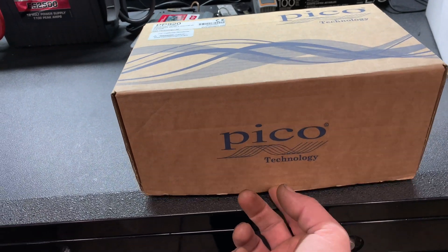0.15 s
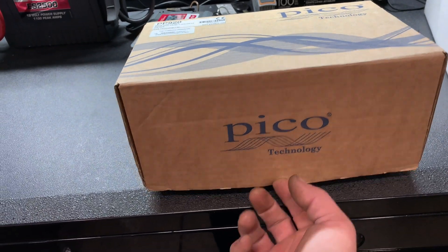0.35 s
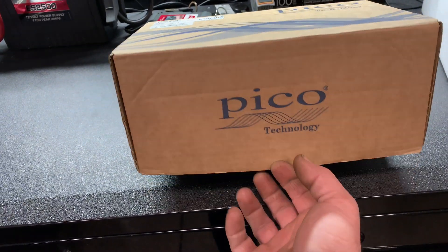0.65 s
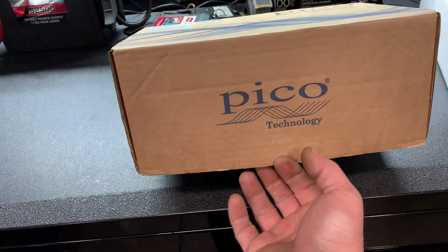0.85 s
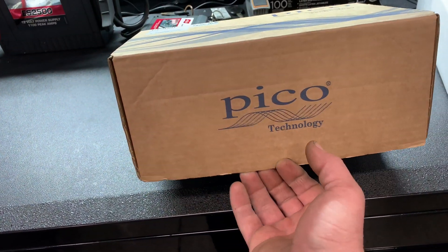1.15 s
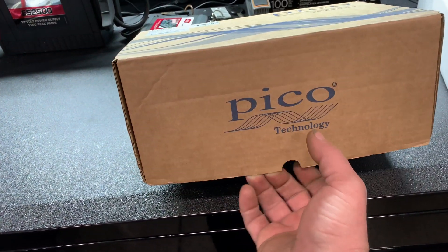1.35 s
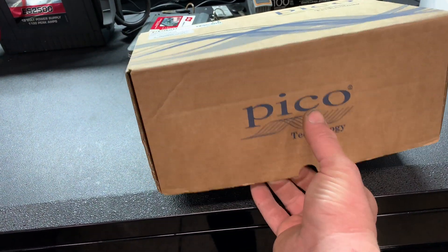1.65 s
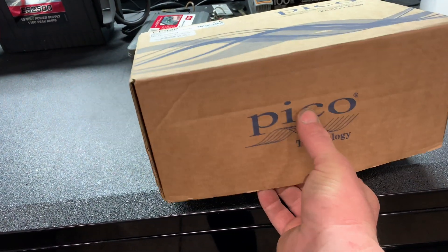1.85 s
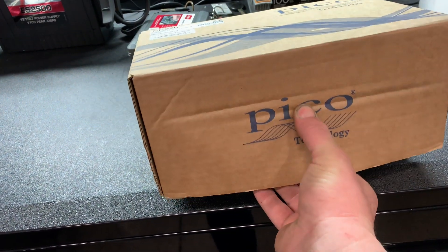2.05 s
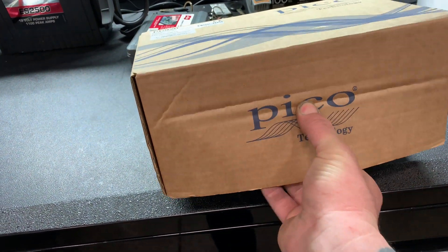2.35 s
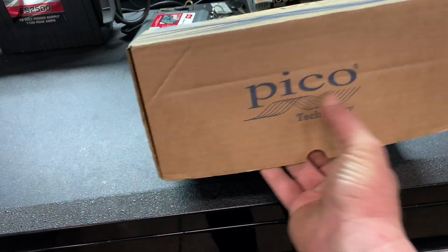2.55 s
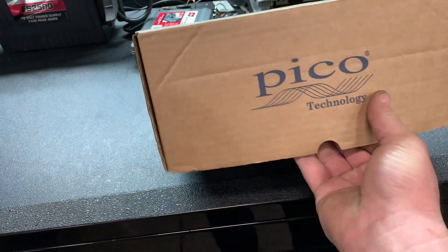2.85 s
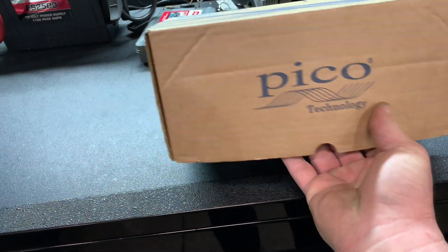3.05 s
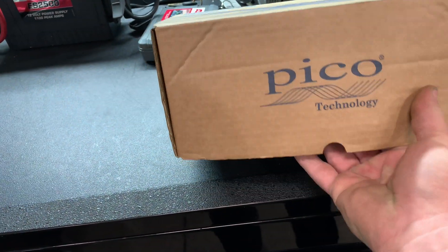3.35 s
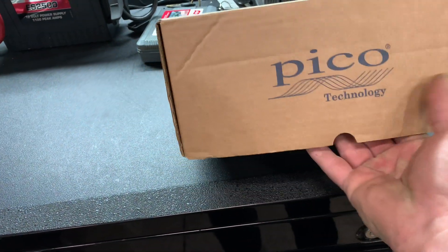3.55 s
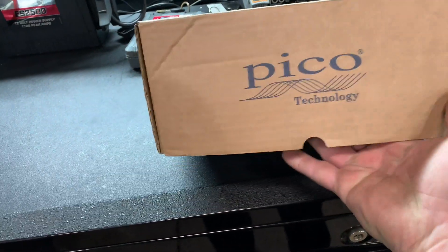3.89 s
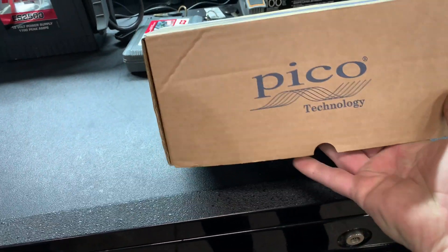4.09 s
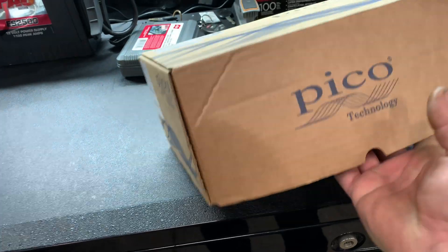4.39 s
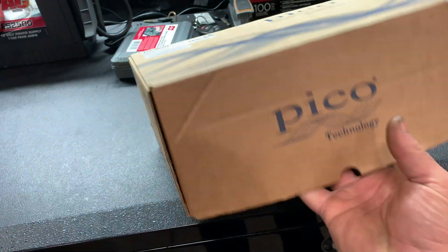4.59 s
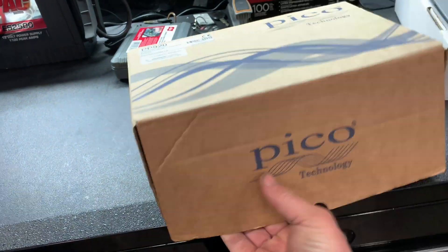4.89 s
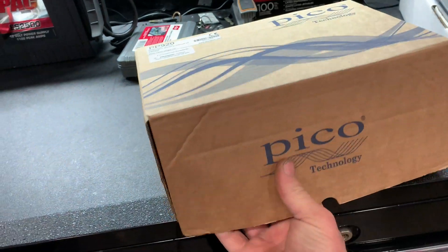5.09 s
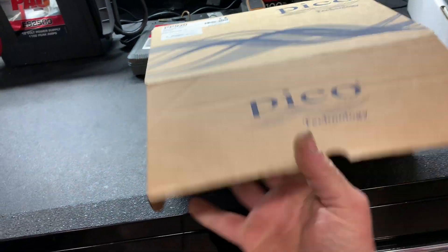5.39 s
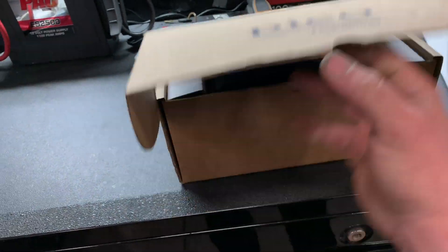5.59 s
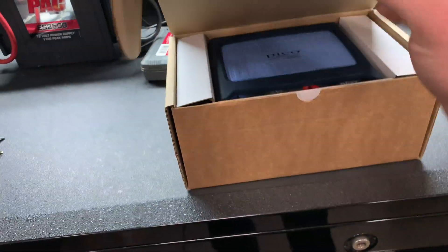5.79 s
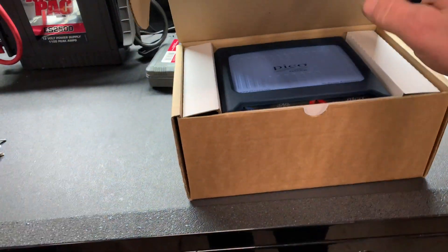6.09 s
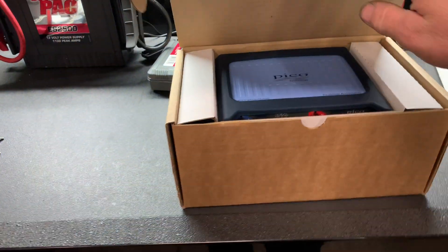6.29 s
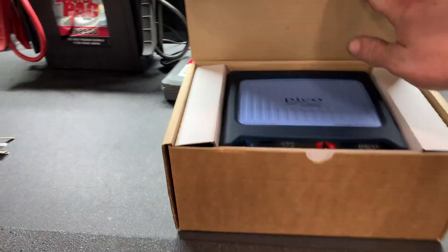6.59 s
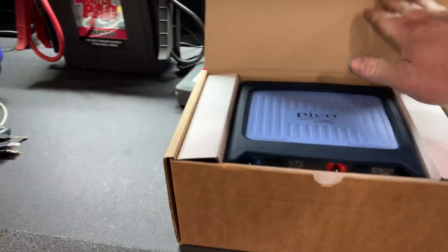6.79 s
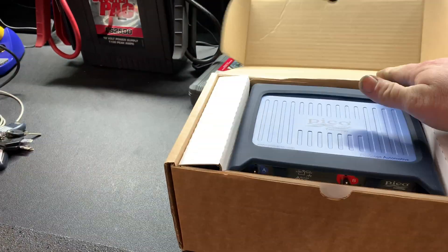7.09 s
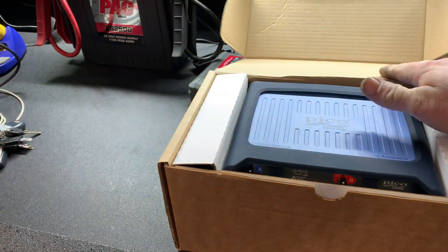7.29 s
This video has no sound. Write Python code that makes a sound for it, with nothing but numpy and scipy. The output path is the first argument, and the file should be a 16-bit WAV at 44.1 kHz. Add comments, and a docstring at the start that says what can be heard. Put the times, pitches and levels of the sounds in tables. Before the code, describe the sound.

Dry skin rasps and knocks on cardboard, a sharp flap crack, brief lid friction, and finally a loud quick double slap in a quiet workshop.

```python
"""Workshop, at a workbench: a hand gropes along a cardboard box, tugs its tucked flap, lifts the lid, slaps the contents.
Rubbing and palm are filtered noise; knocks, thuds, slaps and a dry crack are decaying noise bursts and tones.
Dragged flap edges are noise in one narrow resonance each. The room echoes the box; behind it are
a low rumble and thin fizz of filtered noise and a faint whine of two unsteady tones."""
import sys
import numpy as np
from scipy import signal
from scipy.fft import rfft, irfft, next_fast_len
from scipy.io import wavfile
from scipy.ndimage import uniform_filter1d, map_coordinates

SR = 44100
rng = np.random.default_rng(int(sys.argv[2]) if len(sys.argv) > 2 else 0)


def transcribe(signal):
    """Save signal, clipped to [-1, 1], as a 16-bit WAV file at the path in sys.argv[1]."""
    frames = np.atleast_2d(signal).T
    limited = np.clip(frames, -1, 1)
    pcm = np.round(limited * 32767).astype(np.int16)
    wavfile.write(sys.argv[1], SR, pcm)


N = 328148

# Resonances of the hollow box. Each row: centre in Hz, width in Hz, weight in dB.
PANELS = [(96.3, 36.4, -0.5), (227.5, 120.5, 2), (295.5, 143, 4), (405.7, 152, -1)]
# Resonances of the flaps. Each row: centre in Hz, width in Hz, weight in dB.
BOARD = [(796, 562, -3.5), (1206, 852, 3), (1501, 682, 4), (1832, 437, -1), (2450, 890, -9.5),
         (4010, 1600, -16.5)]
# Colour of skin hiss and crackle. Each row: frequency in Hz, gain in dB.
SKIN = [(800, -7), (2500, 1.5), (4500, -3.5), (7500, 2), (10000, 6), (13000, 5), (15300, 1.5), (16400, -16)]
SWELL_SHARPNESS = 0.95  # exponent of the arch of strokes and scrapes


def amp(db):
    """Gain of a level in dB."""
    return 10 ** (np.asarray(db) / 20)


def unit(x):
    """Scaled to rms 1."""
    return x / np.sqrt(np.mean(x ** 2) + 1e-20)


def along(points, hz):
    """(Hz, value) points interpolated on a log frequency axis."""
    f, v = np.transpose(points)
    return np.interp(np.log(hz + 1), np.log(f + 1), v)


def curves(rows):
    """One value per sample for each column after the time."""
    s, *cols = np.transpose(rows)
    return [np.interp(np.arange(N) / SR, s, c) for c in cols]


def swells(rows, peak, sharp):
    """Gain for each dB column: each row swells to its peak (share of length) and fades; overlaps add in power."""
    start, length, *cols = np.transpose(rows)[:, :, None]
    u = np.clip((np.arange(0, N, 32) / SR - start) / length, 0, 1)
    warped = u ** (np.log(.5) / np.log(peak))
    arch = np.abs(np.sin(np.pi * warped)) ** sharp
    return [np.repeat(np.linalg.norm(amp(db) * arch, axis=0), 32)[:N] for db in cols]


def span(start_s, t):
    """Samples taken by an event with time axis t."""
    first = round(start_s * SR)
    return slice(first, first + len(t))


def wobble(rate_hz):
    """A smooth random curve, rate_hz knots a second."""
    knots = rng.standard_normal(int(N * rate_hz / SR) + 4)
    return map_coordinates(knots, [np.arange(N) * rate_hz / SR])


def filtered(x, response):
    """x times a complex response of frequency."""
    m = next_fast_len(N + SR // 2)
    return irfft(rfft(x, m) * response(np.fft.rfftfreq(m, 1 / SR)), m)[..., :N]


def ringing(modes):
    """Causal response of a few resonances summed with alternating sign."""
    def response(f):
        total = 0
        for k, (centre, width, db) in enumerate(modes):
            resonance = 1j * f * width / (centre * centre - f * f + 1j * f * width + 1e-9)
            total = total + (-1) ** k * amp(db) * resonance
        return total
    return response


def skin_colour(f):
    """Gain of skin on board against frequency."""
    return amp(along(SKIN, f))


def grit(rate_hz, spiky_db, patchy_db):
    """Fibres catching: noise whose size wanders at rate_hz and whose colour shifts as the contact moves."""
    z = signal.stft(rng.standard_normal((2, N)), nperseg=256)[2]
    field = uniform_filter1d(rng.standard_normal(z.shape[1:]), size=2, axis=0)
    field = uniform_filter1d(field, size=10, axis=1)
    patchy = signal.istft(z * amp(patchy_db * unit(field)), nperseg=256)[1][:, :N]
    return patchy * amp(spiky_db * wobble(rate_hz))


def spread(pair, alike):
    """Channels mixed as mid and side, so that unrelated ones leave with the given left-right likeness."""
    def weights(hz):
        turn = np.arccos(np.clip(along(alike, hz), 0, 1)) / 2
        return np.array([np.cos(turn), np.sin(turn)])
    mid, side = filtered(pair, weights)
    return np.array([mid + side, mid - side])


def background():
    """A lumpy low rumble and thin bands of fizz from filtered noise, and two whining tones of unsteady level and phase."""
    # Rumble colour. Each row: frequency in Hz, gain in dB.
    rumble_colour = [(18, -60), (33, 1), (55, -1.5), (100, -13), (400, -33.5), (900, -40), (3500, -50),
                     (16000, -62)]
    # Fizz bands. Each row: centre in Hz, width in Hz, weight in dB (filter applied twice).
    fizz_bands = [(4310, 105, 3), (5126, 670, 0), (6690, 390, 0), (8240, 1100, -3.5)]
    # Whining tones. Each row: pitch in Hz, middle peak level in dB.
    whine_tones = [(4334, -65.5), (8000, -66)]
    rumble = unit(filtered(grit(5.6, spiky_db=3.5, patchy_db=-2.0), lambda f: amp(along(rumble_colour, f))))
    fizz = unit(filtered(grit(30, spiky_db=2.0, patchy_db=2.5), lambda f: ringing(fizz_bands)(f) ** 2))
    t = np.arange(N) / SR
    whine = 0
    for hz, db in whine_tones:
        level = amp(db + 2.5 * wobble(13))
        phase = 2 * np.pi * hz * t + [[0], [1]] + 2.0 * wobble(8.7)
        whine = whine + level * np.sin(phase)
    return amp(-43.0) * rumble + amp(-57.5) * fizz + whine


def rubbing():
    """Skin and flaps drag over corrugated board: rasp, hiss and box boom stutter together, single fibres catch."""
    # Steady lean of flaps and hand. Each row: time in seconds, rasp gain in dB.
    pressure = [(0, -55.5), (.35, -78.5), (.6, -65), (1.3, -92), (1.55, -57.5), (2.1, -59.5), (2.3, -67),
                (2.42, -56.5), (3.0, -55.5), (3.9, -52), (4.2, -49.5), (4.5, -51.5), (5.05, -47.5),
                (5.22, -41.5), (5.75, -45), (5.9, -63), (6.2, -50.5), (6.5, -44), (6.65, -58.5), (7.1, -58),
                (7.2, -53)]
    # Strokes of skin. Each row: start in seconds, length in seconds, hiss gain in dB, rasp gain in dB.
    skin_strokes = [(.66, 0.27, -61, -57.5), (1.38, 0.061, -45.5, -40), (1.5, 0.14, -48, -50.5),
                    (1.915, 0.062, -50.5, -46.5), (2.385, 0.36, -50, -52), (2.63, 0.31, -46, -55.5),
                    (2.99, 0.21, -49.5, -47.5), (3.12, 0.2, -44, -69), (3.29, 0.12, -46.5, -47.5),
                    (3.489, 0.029, -36.5, -34), (3.54, 0.079, -42, -41.5), (3.645, 0.083, -34, -39.5),
                    (3.77, 0.14, -44.5, -58), (3.89, 0.045, -37.5, -43), (4.1, 0.27, -49, -70),
                    (4.226, 0.046, -41, -39.5), (4.316, 0.038, -36.5, -43.5), (4.35, 0.16, -42, -45),
                    (4.49, 0.16, -45.5, -44.5), (4.574, 0.024, -35.5, -36.5), (4.64, 0.092, -41, -66),
                    (4.73, 0.11, -43.5, -46.5), (4.86, 0.12, -34, -41), (5.213, .12, -31.5, -34.5),
                    (5.36, 0.23, -35, -43.5), (5.59, 0.16, -34.5, -52), (5.72, 0.13, -45, -51),
                    (6.47, 0.26, -45, -52), (6.62, 0.61, -49, -66)]
    # Drumming of the panels. Each row: time in seconds, boom gain in dB re rasp gain.
    drumming = [(0, 5), (1.3, -1.5), (2.05, 10.5), (2.5, 1), (3.7, 4.5), (5.05, 0), (5.3, 6), (7.1, -8),
                (7.3, 8)]
    steady_hiss_db = -5.5  # re steady rasp gain
    catches_per_s, catch_db, catch_spread_db = 370, -9.5, 17

    steady = amp(curves(pressure)[0])
    hiss_gain, rasp_gain = swells(skin_strokes, 0.36, SWELL_SHARPNESS)
    rasp_gain = np.hypot(rasp_gain, steady)
    hiss_gain = np.hypot(hiss_gain, amp(steady_hiss_db) * steady)
    boom_gain = rasp_gain * amp(curves(drumming)[0])

    stutter = amp(0.86 * wobble(30) + 1.08 * wobble(90))
    caught = rng.random(N) < catches_per_s / SR
    catches = caught * amp(catch_spread_db * rng.random(N)) * rng.standard_normal((2, N))

    rasp = unit(stutter * filtered(grit(270, spiky_db=0.5, patchy_db=3.5), ringing(BOARD)))
    rasp = rasp + amp(catch_db) * unit(filtered(catches, lambda f: ringing(BOARD)(f) ** 2))
    boom = filtered(grit(35, spiky_db=2.5, patchy_db=-3.5), lambda f: ringing(PANELS)(f) ** 2)
    boom = unit(stutter * boom)
    hiss = unit(stutter * filtered(grit(900, spiky_db=-1, patchy_db=2.0), skin_colour))
    hiss = hiss + amp(catch_db) * unit(filtered(catches, skin_colour))
    return rasp_gain * rasp + boom_gain * boom + hiss_gain * hiss


def knocks():
    """Each snap of the board scuffs it, plucks a flap and crackles: two noise bursts and a decaying tone."""
    # Snaps. Each row: start in seconds, drive level in dB, crackle drive in dB re that, flap pitch in Hz.
    snaps = [(0.027, -33, 1.5, 1850), (0.205, -36.5, -1, 1200), (0.384, -40, -0.5, 1180),
             (1.262, -20.5, -15.5, 2900), (1.376, -29, -5, 1050), (1.411, -19.5, -12, 1256),
             (1.527, -22, -11, 1110), (1.576, -37, 1, 1090), (1.748, -32, -8.5, 1260),
             (1.85, -27, -5.5, 1090), (1.937, -36, -5, 1100), (1.977, -35, 0.5, 1230),
             (2.02, -34.5, -1, 1010), (2.053, -30.5, -1.5, 1310), (2.1, -34, 4, 1450),
             (2.39, -34, -0.5, 1190), (2.68, -28, -22, 1690), (2.884, -26.5, -29, 1760),
             (3.085, -30, -30, 1290), (3.144, -25, -24, 1480), (3.234, -33, -17, 1000),
             (3.332, -19, -10.5, 1550), (3.4998, -17, -8, 1460), (3.688, -29, -17, 1400),
             (3.827, -14.5, -29, 1210), (3.863, -9, -20, 1610), (3.949, -22.5, -10, 1340),
             (4.2479, -14, -12.5, 1400), (4.616, -19.5, -32, 1380), (4.849, -28.5, -5, 1370),
             (4.958, -16, -44, 1600), (5.012, -40, -26, 1620), (5.04, -25.5, -16, 1230),
             (5.241, -15, -6, 1650), (5.328, -27.5, -8, 805), (7.018, -30, -35, 1250)]
    scuff, pluck, crackle = np.zeros((3, 2, N + SR))
    t = np.arange(SR // 8) / SR
    rise = 1 - np.exp(-t / 0.0011)
    for s, db, crackle_db, hz in snaps:
        at = span(s, t)
        scuff[:, at] += amp(db - 60 * t / 0.034) * rise * rng.standard_normal((2, len(t)))
        tone = np.sin(2 * np.pi * (hz * t + [[0], [rng.random()]]))
        pluck[:, at] += amp(db - 60 * t * hz / 11) * rise * tone  # 60 dB down in 11 cycles
        crackle[:, at] += amp(db + crackle_db - 60 * t / 0.021) * rise * rng.standard_normal((2, len(t)))
    scuff = amp(3.0) * filtered(scuff, ringing(BOARD))
    crackle = amp(2.0) * filtered(crackle, skin_colour)
    return scuff + amp(7.5) * pluck[:, :N] + crackle


def thuds():
    """The struck panel swings a few cycles at its own pitch and stirs the hollow box."""
    # Dull thuds of the box body. Each row: start in seconds, drive level in dB, pitch in Hz.
    body_thuds = [(0.062, -36.5, 287), (0.576, -40.5, 305), (1.263, -30.5, 142), (1.399, -31, 400),
                  (1.41, -20, 285), (1.528, -27.5, 380), (1.543, -30, 305), (1.851, -29, 187),
                  (1.947, -34, 291), (1.974, -32, 210), (2.023, -24.5, 250), (2.055, -25.5, 257),
                  (2.099, -29.5, 293), (3.332, -33.5, 313), (3.503, -14.5, 202), (3.665, -16.5, 236),
                  (3.69, -27.5, 198), (3.828, -18.5, 239), (3.866, -17, 273), (4.251, -25, 170),
                  (4.588, -27, 313), (4.616, -23, 270), (4.923, -22.5, 205), (5.041, -26.5, 244),
                  (5.276, -17, 97), (5.291, -14.5, 93), (5.33, -26.5, 417), (5.482, -21, 103)]
    swing, push = np.zeros((2, N + SR))
    t = np.arange(SR // 5) / SR
    for s, db, hz in body_thuds:
        at = span(s, t)
        # low swings rise and die more slowly
        envelope = amp(db - 60 * t * np.sqrt(hz) / 0.49) * (1 - np.exp(-t * hz / .5))
        swing[at] += envelope * np.sin(2 * np.pi * hz * t)
        push[at] += amp(db - 60 * t / 0.047) * (1 - np.exp(-t * hz)) * rng.standard_normal(len(t))
    return amp(8.0) * swing[:N] + amp(20.0) * filtered(push, ringing(PANELS))


def scrapes():
    """A dragged flap edge sings: fibre noise in one resonance, building up late and letting go."""
    # Drags. Each row: start in seconds, length in seconds, gain in dB, pitch in Hz.
    drags = [(3.701, 0.017, -31.5, 1340), (4.337, 0.089, -37, 1410), (4.905, 0.043, -34.5, 1410),
             (5.151, 0.15, -34.5, 1650), (5.248, 0.08, -38.5, 910), (5.524, 0.045, -40, 772)]
    q, peak_share = 6, .65
    out, fibres = np.zeros((2, N)), grit(120, spiky_db=2, patchy_db=2.5)
    for s, length, db, hz in drags:
        at = slice(round(s * SR), round((s + length) * SR))
        b, a = signal.iirpeak(hz, q, SR)
        sung = signal.lfilter(b, a, signal.lfilter(b, a, fibres[:, at]))
        gain = swells([(s, length, db)], peak_share, SWELL_SHARPNESS)[0]
        out[:, at] += gain[at] * unit(sung)
    return out


def flap_crack():
    """The tucked flap springs free: one dry, fast-dying burst of random-sign noise."""
    # Cracks. Each row: start in seconds, drive level in dB.
    bursts = [(5.2397, -5.5)]
    t60_s = .004
    crack = np.zeros((2, N + SR))
    t = np.arange(SR // 8) / SR
    for s, db in bursts:
        crack[:, span(s, t)] += amp(db - 60 * t / t60_s) * np.sign(rng.standard_normal((2, len(t))))
    return amp(2.0) * filtered(crack, skin_colour)


def palm_push():
    """The palm pushes the open lid back: friction noise in the lid's resonances, swelling late and bluntly."""
    # Pushes. Each row: start in seconds, length in seconds, gain in dB.
    pushes = [(6.13, 0.125, -46), (6.385, 0.16, -34.5)]
    # Open lid. Each row: centre in Hz, width in Hz, weight in dB (filter applied twice).
    lid_modes = [(420, 170, -3), (1190, 140, 0), (1480, 120, -5), (2060, 200, -3)]
    friction = unit(filtered(grit(90, spiky_db=1.2, patchy_db=1.5), lambda f: ringing(lid_modes)(f) ** 2))
    return swells(pushes, 0.73, 0.3)[0] * friction


def slaps():
    """Flat fingers land on the packed contents: a crack, a rattle of board, and box modes that swell and decay."""
    # Slaps. Each row: start in seconds, drive level in dB, crack and rattle drive in dB re that.
    finger_slaps = [(7.145, 2.5, -12.5, 5.5), (7.187, 3.5, -13, -0.5)]
    # Box modes. Each row: pitch in Hz, middle level in dB re drive, t60 in seconds.
    box_modes = [(170, 3, 0.035), (227.7, -4, 0.12), (377.4, 2.5, 0.089), (873, 3.5, 0.017),
                 (1124, -1, 0.01)]
    out, rattle = np.zeros((2, 2, N + SR))
    t = np.arange(SR // 3) / SR
    for s, db, crack_db, rattle_db in finger_slaps:
        at = span(s, t)
        ring = 0
        for hz, level, t60 in box_modes:
            decay = amp(level + rng.normal(0, 1) - 60 * (t / t60) ** 1.07)
            ring = ring + decay * np.sin(2 * np.pi * hz * t + 0.22 * rng.standard_normal())
        ring = ring * (1 - np.exp(-(t / 0.0024) ** 2))
        crack_decay = amp(-60 * t / 0.025) + 0.73 * amp(-60 * t / 0.058)
        crack = amp(crack_db) * crack_decay * rng.standard_normal((2, len(t)))
        crack = crack * (1 - np.exp(-t / 0.0021))
        out[:, at] += amp(db - 7.5) * (ring + crack)
        rattle_envelope = amp(db + rattle_db - 60 * t / 0.063) * (1 - np.exp(-t / 0.00038))
        rattle[:, at] += rattle_envelope * rng.standard_normal((2, len(t)))
    rattle = filtered(rattle, lambda f: ringing(BOARD)(f) / (1 + 1j * f / 2500))
    return out[:, :N] + amp(-1.0) * rattle


def workshop(x):
    """The room answers after 400 samples with decaying noise, each frequency dying at its own speed."""
    # Room decay. Each row: frequency in Hz, t60 in seconds.
    room_decay = [(100, 0.49), (2000, 0.17), (12000, 0.27)]
    hz, t, z = signal.stft(rng.standard_normal((2, SR // 2)), SR, nperseg=256)
    decay = amp(-60 * t / along(room_decay, hz)[:, None])
    tail = signal.istft(z * decay, SR, nperseg=256)[1]
    tail = tail / np.linalg.norm(tail[0])
    return signal.fftconvolve(np.pad(x, (400, 0))[None], tail, axes=1)[:, :N]


def scene():
    """The box close by, its echo and the far background."""
    # Stereo of the box. Each row: frequency in Hz, left-right likeness 0 to 1.
    alike_near = [(300, 1), (1500, 0.94), (2400, 0.016), (7500, 0.018), (11000, 1)]
    # Stereo of echo and background. Each row: frequency in Hz, left-right likeness 0 to 1.
    alike_far = [(200, 0.96), (700, 0.86), (7500, 0.028), (11000, 1)]
    far = background()
    box = rubbing() + knocks() + thuds() + scrapes() + flap_crack() + palm_push() + slaps()
    far = far + amp(-14) * workshop(box[0])
    return spread(box, alike_near) + spread(far, alike_far)


def record(dry):
    """Left differs from right in level and phase lag; loud peaks are rounded off, then the band is limited."""
    # Left level. Each row: frequency in Hz, left minus right in dB.
    left_gain = [(500, 0.5), (1300, 2), (2400, 3.5), (4400, 1.5), (8000, -1)]
    # Left lag. Each row: frequency in Hz, lag behind right in cycles.
    left_lag = [(200, 0), (2000, .15), (8400, 0), (11300, .5), (13800, 1), (15600, 1.5)]
    full_scale, top_hz = .95, 16480

    def ports(hz):
        left = amp(along(left_gain, hz)) * np.exp(-2j * np.pi * along(left_lag, hz))
        return np.array([left, np.ones_like(left)])

    heard = filtered(dry, ports)
    rounded = heard / (1 + np.abs(heard / full_scale) ** 6) ** (1 / 6)
    return filtered(rounded, lambda hz: hz < top_hz)


dry = scene()
out = record(dry)
transcribe(out)
```